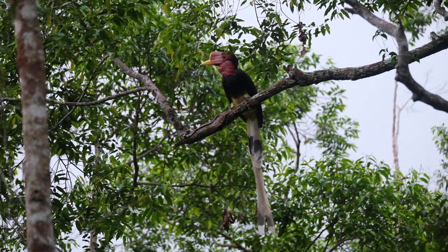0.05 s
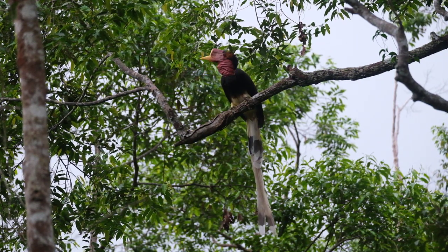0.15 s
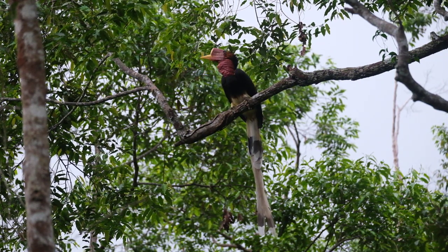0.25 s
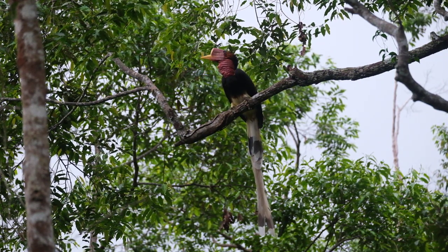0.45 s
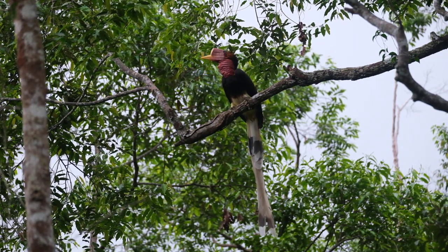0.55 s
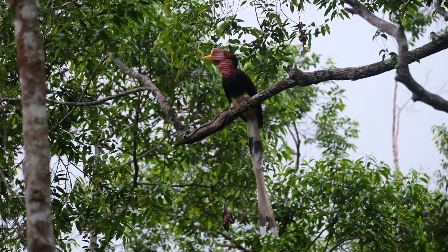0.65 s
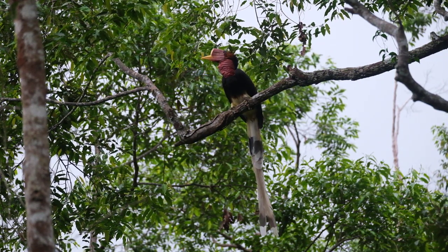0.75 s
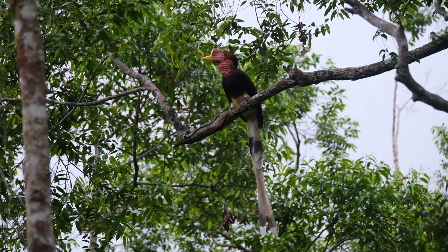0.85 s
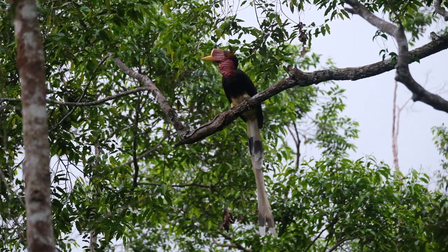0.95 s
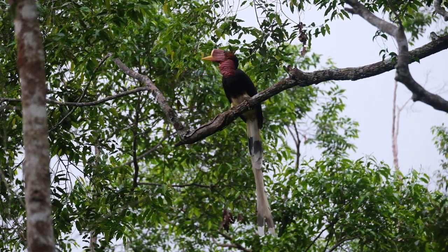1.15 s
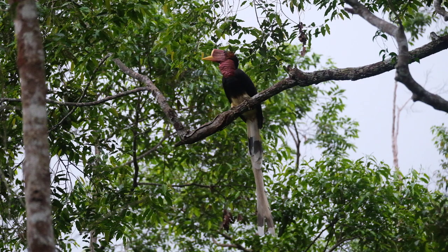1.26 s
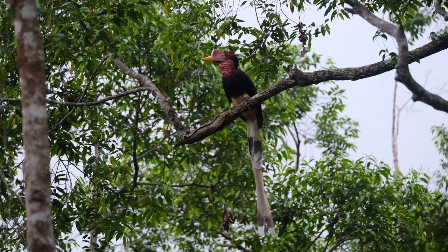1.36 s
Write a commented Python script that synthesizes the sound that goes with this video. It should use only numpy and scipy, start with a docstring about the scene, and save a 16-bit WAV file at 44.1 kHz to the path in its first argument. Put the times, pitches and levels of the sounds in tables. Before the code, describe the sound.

A hornbill gives a short, almost pure hoot that drops in pitch as it ends, then a softer, slightly higher one. Both echo through a forest, over steady shrill insects and faint foliage ticks, heard from some distance.

```python
"""Hornbill in an echoing forest

A hornbill on a high branch gives a short, almost pure hoot that falls in pitch as it dies, then a second,
farther hornbill gives a softer, higher one; a throat resonance colours the weak harmonics. Reflection and
scattering from trunks and crowns return both as a long, fluttering echo. Insects shrill in pulsing bands of
noise over still air, with faint ticks from the foliage, far calls and soft low bumps."""
import sys
import numpy as np
from scipy import signal
from scipy.fft import rfft, irfft, next_fast_len
from scipy.io import wavfile
from scipy.ndimage import uniform_filter1d, map_coordinates

SR = 44100
rng = np.random.default_rng(int(sys.argv[2]) if len(sys.argv) > 2 else 0)


def unload_wav(signal):
    """Save mono or channel-first audio to the path in sys.argv[1] as 16-bit WAV at rate SR, clipped to [-1, 1]."""
    wavfile.write(
        sys.argv[1],
        SR,
        np.round(np.clip(np.atleast_2d(signal).T, -1, 1) * 32767).astype(np.int16),
    )


N = 61739
T = np.arange(N) / SR
SIZE = next_fast_len(N + 8192)
HZ = np.fft.rfftfreq(SIZE, 1 / SR)

# Still air: spectrum (frequency [Hz], relative density [dB])
AIR_SPECTRUM = [(20, -12), (34, -13), (43, 9.5), (54, -2.5), (110, -6.5), (200, -5.5), (420, -5),
                (1100, -10.5), (1450, -8), (1900, -12), (3400, -7.5), (4700, -11.5), (6800, -9.5),
                (10500, -15), (15800, -15)]
# Likeness of the air at the two ears (frequency [Hz], coherence [0-1])
AIR_COHERENCE = [(40, 0), (110, 0), (200, 0.62), (400, 0.83), (800, 0.3), (1300, 0.21), (2400, 0),
                 (10000, 0.22)]
# Insect voices (centre [Hz], half width [Hz], level [dB], pulse rate [Hz], time of a peak [s],
# swing [dB], left lead [ms], coherence [0-1], balance [dB])
INSECT_BANDS = [(2828, 233, -47.5, 2.7, 0.34, 1, 0.099, 0.55, 1),
                (3951, 217, -46.5, 7.31, 0.13, 5.5, .1, 0.58, -0.1),
                (4290, 230, -52.5, 7.3, 0.114, 4, 0.11, 0.52, 0),
                (5298, 305, -43, 7.3, 0.138, 1.96, 0.1, .5, 0.5),
                (5840, 350, -46.5, 7.34, 0.039, 0.65, .12, .35, -0.5),
                (8416, 640, -48, 7.3, 0.03, 0.65, 0.1525, .2, 1.2),
                (14320, 540, -49, 7.3, .056, 4, -0.055, .3, .5),
                (15300, 1100, -52.5, 7.4, .056, 0, -0.059, .2, 0)]
# Cricket notes (centre [Hz], half width [Hz], level [dB])
CRICKET_BANDS = [(2774, 26, -58), (2905, 17, -57.5), (3402, 11, -63.5), (3798, 7, -54.5), (4057, 13, -56),
                 (4400, 13, -61), (4500, 15, -68), (5280, 11, -54)]
# Soft low bumps (start [s], duration [s], pitch [Hz], glide [Hz/s], level [dB])
BUMP_GLIDES = [(-.03, .13, 97.5, -2, -57.5), (.46, 0.099, 114.4, -120, -57.5)]
# Far calls (start [s], duration [s], pitch [Hz], glide [Hz/s], level [dB])
FAR_CALL_GLIDES = [(.115, 0.07, 543, 2020, -55.5), (1.02, 0.068, 1391, 199.4, -54.5)]
# Foliage ticks (time [s], level [dB], centre [Hz], width [octaves], T60 [s])
FOLIAGE_TICKS = [(.092, -42, 1110, .7, 0.024), (0.381, -38.5, 2600, .8, 0.057),
                 (.466, -38.5, 1820, 0.51, 0.026), (0.6714, -31, 920, 0.71, 0.019),
                 (.71, -36, 1660, 1, 0.041), (0.723, -37.5, 1718, 0.87, 0.021),
                 (1.032, -44.5, 1000, 1, 0.14), (1.059, -42, 980, 1, 0.11)]
# Fundamental of each hoot (time [s], pitch [Hz], level [dB])
LOUD_CONTOUR = [(.194, 478.7, -50), (.202, 486.3, -29), (.209, 487.6, -21), (.225, 487.6, -15.5),
                (.241, 496, -13.5), (.258, 484.8, -14.5), (.267, 474, -22.5), (.276, 421, -40.5),
                (.293, 364.4, -32), (.316, 330, -48.5), (.335, 313, -63)]
SOFT_CONTOUR = [(.803, 504.4, -45), (.82, 524.7, -45.5), (.835, 542.3, -36.5), (.89, 532.7, -34.5),
                (.922, 526.8, -37), (.94, 495, -53.5)]
# Their overtones (harmonic number, peak level before the throat [dB], growth with fundamental [dB/dB])
LOUD_HARMONICS = [(2, -44.5, .17), (3, -55, .15), (4, -48.5, 1.1), (5, -57, .7), (6, -59, .7), (7, -55, .9),
                  (8, -57, .9), (9, -55, .9)]
SOFT_HARMONICS = [(4, -61, 0.38)]
# Envelope of the rasp (time [s], level [dB])
RASP_ENVELOPE = [(.19, -80), (.205, -53), (.245, -59), (.275, -42), (.31, -45.5), (.36, -48.5), (.5, -52),
                 (.7, -73)]
# Spectrum of the rasp (frequency [Hz], relative density [dB])
RASP_SPECTRUM = [(250, -4), (400, 12), (580, -6), (880, -1), (1050, -1), (1300, 6.5), (1600, 2.5),
                 (1800, -4.5), (2150, 7), (2500, -8), (4300, -1.5), (6000, -8), (10000, -38)]
# Distinct returns from trunks and crowns (delay [s], gain [dB], balance [dB])
REFLECTIONS = [(.06, -22, 3.5), (.116, -29, -4.5), (.204, -33, 1), (.255, -38, 2), (.312, -32, -1),
               (.35, -36, -2), (.46, -37.5, -0.5)]
# Diffuse tail (delay [s], relative level for the loud hoot [dB], for the soft hoot [dB])
SCATTER_ENVELOPE = [(0, -9, -8), (.04, -1, 3), (.09, -2, 0), (.16, -3, -18), (.23, 0, 6), (.33, -12.5, -4),
                    (.45, -9, -9), (.9, -9, -17), (1.2, -24, -22)]
# Spectrum of that tail (frequency [Hz], relative density [dB])
SCATTER_SPECTRUM = [(300, -10), (430, 12.5), (520, 0), (900, 9), (2000, 7.5), (4000, 1)]

THROAT_HZ, THROAT_WIDTH_HZ, THROAT_DB = 768, 81, 13  # the loud hoot's second harmonic sweeps through it
TICK_RISE_S = 0.00087


def amp(db):
    """Amplitude ratio of a level in decibels."""
    return 10 ** (np.asarray(db) / 20)


def along(points):
    """Interpolation of (frequency, value) points on a logarithmic frequency axis."""
    hz, values = np.transpose(points)
    return np.interp(np.log(HZ + 1), np.log(hz + 1), values)


def wobble(rate_hz):
    """Smooth random modulation: a spline through Gaussian values."""
    return map_coordinates(rng.standard_normal(N // 20), [T * rate_hz], mode="wrap")


def pan(x, balance_db):
    """Interaural level difference: a positive balance raises the left and lowers the right."""
    return x * amp([[balance_db], [-balance_db]])


def noise(gain, coherence, lead_ms=0):
    """Partially coherent stereo noise of unit rms, mixed from independent mid and side signals."""
    mid, side = rfft(rng.standard_normal((2, SIZE))) * gain
    angle = np.arccos(np.clip(coherence, -1, 1)) / 2
    mid, side = mid * np.cos(angle), side * np.sin(angle)
    delay = np.exp(-2j * np.pi * HZ * lead_ms / 1000)
    stereo = irfft(np.array([mid + side, (mid - side) * delay]), SIZE)[:, :N]
    return stereo / np.sqrt(np.mean(stereo ** 2) + 1e-20)


def band(hz, width_hz, steepness=3.66):
    """Band-pass resonance, at half power width_hz either side of its centre."""
    return 1 / np.sqrt(1 + np.abs((HZ - hz) / width_hz) ** steepness)


def still_air():
    """Ambient noise whose coherence between the ears varies with frequency."""
    return amp(-46) * noise(amp(along(AIR_SPECTRUM)), along(AIR_COHERENCE))


def insects(squareness=1.3, waver_db=0.66):
    """Amplitude modulation: each kind shrills in its own band and pulses at its own rate."""
    out = np.zeros((2, N))
    for hz, width_hz, db, rate, peak_s, swing_db, lead_ms, coherence, balance_db in INSECT_BANDS:
        pulse = np.tanh(squareness * np.cos(2 * np.pi * rate * (T - peak_s)))
        envelope = amp(db + swing_db * pulse + waver_db * wobble(25.3))
        out += envelope * pan(noise(band(hz, width_hz), coherence, lead_ms), balance_db)
    return out


def crickets():
    """Noise in a very narrow band is heard as a thin, wavering note."""
    return sum(amp(db) * noise(band(hz, width_hz), coherence=0.39, lead_ms=0.084)
               for hz, width_hz, db in CRICKET_BANDS)


def gliding_tones(glides):
    """Linear chirps under half-sine envelopes, heard as low bumps or far calls."""
    out = np.zeros(N)
    for start_s, length_s, hz, glide, db in glides:
        age = np.clip(T - start_s, 0, length_s)
        phase = 2 * np.pi * (hz + glide * age / 2) * age
        out += amp(db) * np.sin(np.pi * age / length_s) * np.sin(phase)
    return np.sqrt(2) * out


def foliage_ticks():
    """Heavy damping: small knocks on leaves and twigs give noise bursts that die at once."""
    out = np.zeros((2, N))
    for start_s, db, hz, octaves, t60_s in FOLIAGE_TICKS:
        age = np.maximum(T - start_s, 0)
        envelope = amp(db - 60 * age / t60_s) * (1 - np.exp(-age / TICK_RISE_S))
        spectrum = np.exp(-.5 * (np.log2((HZ + 1) / hz) / octaves) ** 2)
        out += envelope * noise(spectrum, coherence=0.28)
    return out


def hoot(contour, harmonics, edge_s=0.0066, jitter=0.0039, rough_db=3):
    """Source and filter: a near-pure tone whose weak overtones swell near the throat resonance."""
    times, hz, db = np.transpose(contour)
    pitch = np.interp(T, times, hz) * (1 + jitter * wobble(149.9))
    level_db = uniform_filter1d(np.interp(T, times, db), size=200)
    gate = np.clip(np.minimum(T - times[0], times[-1] - T) / edge_s, 0, 1)
    phase = 2 * np.pi * np.cumsum(pitch) / SR
    voice = amp(level_db) * np.sin(phase)
    for k, peak_db, growth in harmonics:
        source_db = peak_db + growth * (level_db - db.max()) + rough_db * wobble(118.9)
        throat_db = THROAT_DB / (1 + ((k * pitch - THROAT_HZ) / THROAT_WIDTH_HZ) ** 2)
        overtone_db = np.minimum(source_db + throat_db, level_db)  # never above the fundamental
        voice += amp(overtone_db) * np.sin(k * phase)
    return np.sqrt(2) * gate * voice


def ring(start_s, hz, db, rise_s, t60_s):
    """Free vibration: a resonance, once excited, decays exponentially."""
    age = np.maximum(T - start_s, 0)
    envelope = amp(db - 60 * age / t60_s) * (1 - np.exp(-age / rise_s))
    return envelope * np.sin(2 * np.pi * hz * age)


def rasp():
    """Airy broadband noise that peaks as the loud hoot breaks off and lingers among the trees."""
    return amp(np.interp(T, *np.transpose(RASP_ENVELOPE))) * noise(amp(along(RASP_SPECTRUM)), 0.3)


def forest_echo(call, delays_s, scatter_db, tail_db, gap_s=0.041):
    """Reflection from trunks and crowns gives distinct returns; scattering adds a diffuse tail."""
    envelope = amp(np.interp(T, delays_s, scatter_db)) * (T > gap_s)
    tail = envelope * noise(amp(along(SCATTER_SPECTRUM)), coherence=0.71)
    tail /= np.linalg.norm(tail[0])
    out = amp(tail_db) * signal.fftconvolve(call[None], tail, axes=1)[:, :N]
    for delay_s, db, balance_db in REFLECTIONS:
        out += amp(db) * pan(np.interp(T - delay_s, T, call, left=0), balance_db)
    return out


def scene():
    """Superposition of the forest's background, the two hoots and their echoes."""
    background = still_air() + insects() + crickets()
    bumps, far_calls = gliding_tones(BUMP_GLIDES), gliding_tones(FAR_CALL_GLIDES)
    ticks = foliage_ticks()
    throat = ring(start_s=.1985, hz=THROAT_HZ, db=-27, rise_s=0.00098, t60_s=0.035)  # at the hoot's onset
    loud = hoot(LOUD_CONTOUR, LOUD_HARMONICS) + throat
    twig = ring(start_s=.6715, hz=1006, db=-27.5, rise_s=TICK_RISE_S, t60_s=0.017)  # the clearest tick
    soft = hoot(SOFT_CONTOUR, SOFT_HARMONICS)
    bird = pan(loud + soft, balance_db=-1.3) + rasp()
    delays_s, after_loud_db, after_soft_db = np.transpose(SCATTER_ENVELOPE)
    echo = forest_echo(loud, delays_s, after_loud_db, tail_db=-25.5)
    echo += forest_echo(soft, delays_s, after_soft_db, tail_db=-10)
    return background + bumps + far_calls + ticks + twig + bird + echo


def record(dry, cutoff_hz=15780):
    """Band limiting: an ideal low-pass filter removes everything above the cutoff."""
    return irfft(rfft(dry, SIZE) * (HZ < cutoff_hz), SIZE)[:, :N]


dry = scene()
out = record(dry)
unload_wav(out)
```